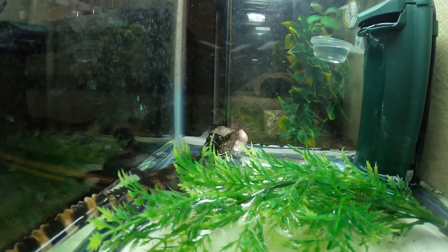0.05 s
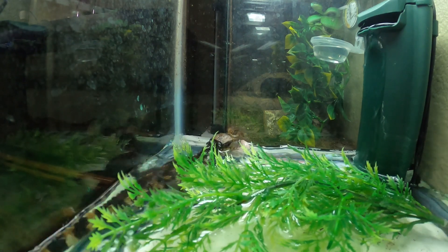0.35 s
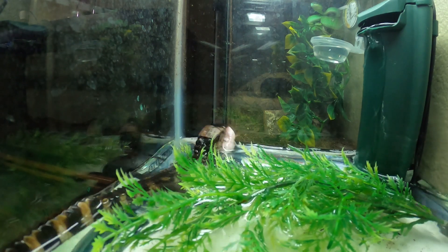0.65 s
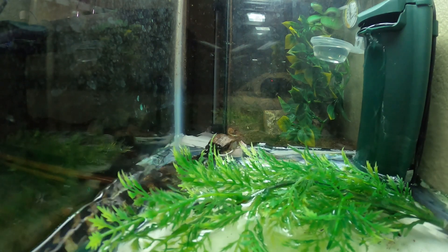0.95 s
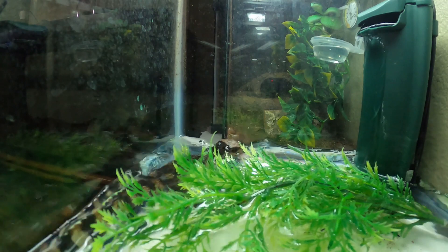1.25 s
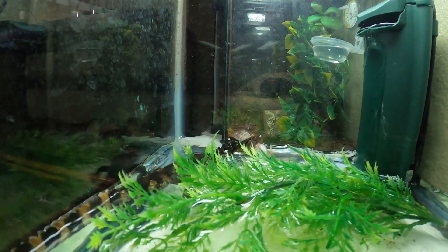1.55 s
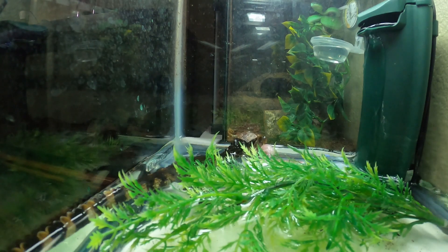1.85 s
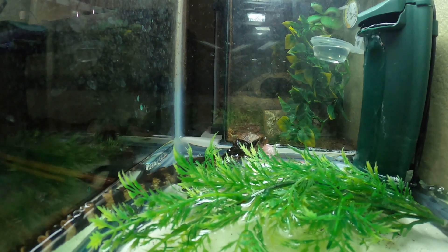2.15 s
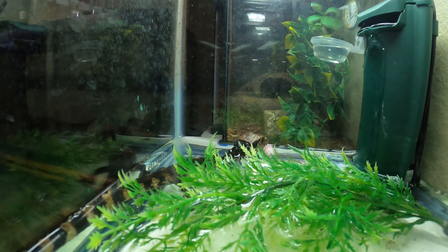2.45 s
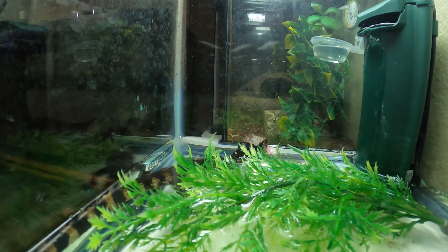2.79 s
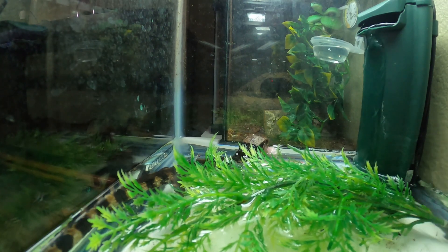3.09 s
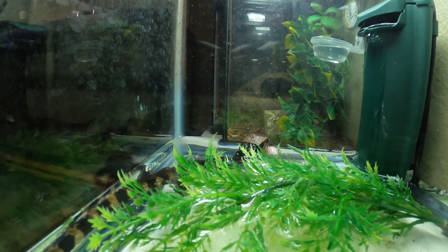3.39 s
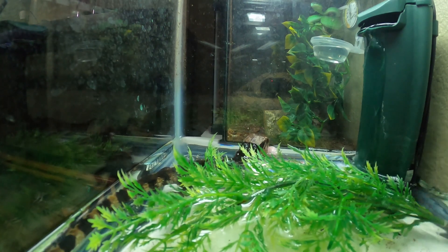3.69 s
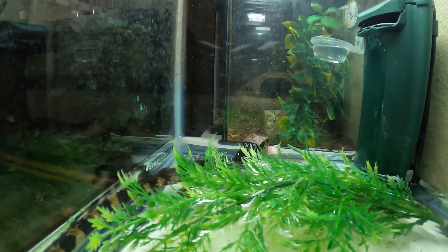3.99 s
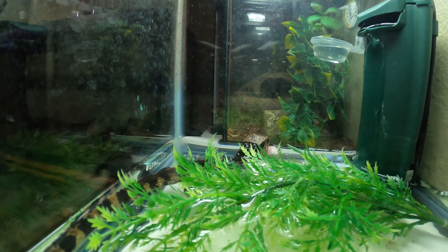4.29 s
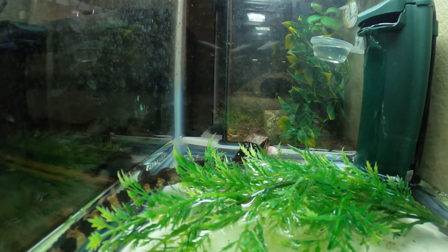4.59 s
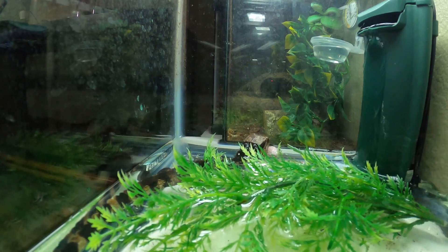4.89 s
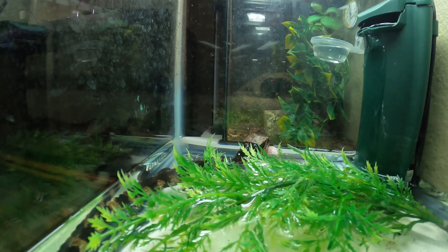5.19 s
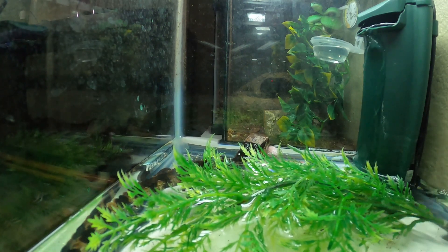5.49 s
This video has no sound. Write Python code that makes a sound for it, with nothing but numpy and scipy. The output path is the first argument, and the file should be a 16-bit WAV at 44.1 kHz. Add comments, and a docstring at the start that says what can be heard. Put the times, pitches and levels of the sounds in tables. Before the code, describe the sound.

In a small room, close to a shallow aquarium, a filter runs steadily with a low motor hum, a fast plastic rattle and churning, faintly fizzing water. Near the start something, probably a small turtle, bumps the tank dully, then clacks on the glass twice with quick splashes, the second bigger. After that the filter carries on, with an occasional soft ping of a tiny bubble popping.

```python
"""A small room, one microphone close to a shallow aquarium with a hang-on filter running.
The loose impeller rattles and grinds in the plastic housing, the mains motor hums, and the outflow
churns and fizzes. In the first seconds something, probably a small turtle, bumps the tank, clacks on
the glass and flicks the water. Now and then a soft ping is heard as a tiny bubble pop."""
import sys
import numpy as np
from scipy import signal
from scipy.fft import rfft, irfft
from scipy.io import wavfile

SR = 44100
rng = np.random.default_rng(int(sys.argv[2]) if len(sys.argv) > 2 else 0)


def file_out(sig):
    """Save sig as 16-bit WAV at sys.argv[1]."""
    # one column per channel
    cols = np.atleast_2d(sig).T
    # limit, then scale
    lim = np.clip(cols, -1, 1)
    pcm = np.round(lim * 32767).astype(np.int16)
    wavfile.write(sys.argv[1], SR, pcm)


N = 253134
TIME = np.arange(N) / SR
MAINS_HZ, CUTOFF_HZ = 59.98, 15500

# resonances of the plastic filter housing: f/Hz, width/Hz, knocked level/dB, rubbed level/dB
HOUSING_MODES = [(583, 32, -24, -11.5), (727, 32, -18, -3.5), (745.7, 40, -12, 0), (821, 10, -32.5, -10.5),
                 (1014.4, 54.5, 4, 13.5), (1081, 48, -11, -3), (1207.5, 19, -22, -2), (1267, 30, -17, 3.5),
                 (1360.4, 10.5, -24, 12), (1550.5, 42, -14.5, 2), (1670, 73, -6.5, -8.5),
                 (1782, 44, -19.5, -9), (1914, 24, -30, -11), (2220, 71, -11, -4.5), (2340, 45, -21.5, -6),
                 (2401, 49, -17.5, -2), (2459, 35, -22, -4.5), (2590, 55, -17, -5), (2773, 83, -10.5, -0.5),
                 (2878, 56, -17, 5.5), (2966, 33, -25, -3.5), (3050, 91, -23, -4.5), (3270, 40, -31, -8.5),
                 (3425, 27, -26.5, -2), (3486, 26, -28.5, -29.5), (3620, 24, -38, -8)]


def motor_hum(waver_db=0.2):
    """The motor hums in steady lines locked to the mains, the strongest at twice its frequency."""
    # hum lines: multiple of the mains frequency, rms level/dB
    lines = [(2, -29.5), (3, -37), (4, -43.5), (4.5, -61), (5, -49.5), (7, -64), (8, -67.5), (10, -73.5),
             (12, -55), (14, -75.5), (17, -56.5)]
    out = np.zeros(N)
    for multiple, db in lines:
        amplitude = np.sqrt(2) * from_db(db + waver_db * drift(12))
        out += amplitude * np.sin(2 * np.pi * (multiple * MAINS_HZ * TIME + rng.random()))
    return out


def impeller_rattle(softest_db=-47, hardest_db=-36, vary_db=1.95, bounce_db=-9,
                    jitter_s=0.0004, lead_s=0.0004):
    """The loose rotor taps its shaft once a turn and bounces back lightly; the housing rings."""
    # knocks that stand out from the random taps of the other turns: t/s, level/dB
    knocks = [(.05, -29), (.067, -33.5), (.417, -33.5), (.518, -35), (.551, -33), (.651, -32),
              (.684, -32.5), (.717, -34.5), (.784, -35.5), (.868, -34), (1.2, -32.5), (1.468, -31.5),
              (1.667, -32.5), (1.734, -30.5), (1.784, -33), (1.801, -35), (1.835, -32), (1.901, -32),
              (1.934, -33.5), (2.002, -34.5), (2.035, -35), (2.051, -33.5), (2.135, -31.5), (2.184, -30.5),
              (2.301, -32.5), (2.452, -29.5), (2.57, -32), (2.701, -32.5), (2.718, -31), (2.784, -33),
              (2.919, -33), (3.119, -34), (3.169, -31), (3.236, -34), (3.352, -33.5), (3.602, -34),
              (3.686, -36), (3.819, -29), (3.967, -31.5), (4.002, -33.5), (4.086, -31.5), (4.185, -30.5),
              (4.601, -35), (4.719, -32.5), (4.803, -32), (4.853, -30.5), (4.904, -34.5), (5.035, -31.5),
              (5.118, -33), (5.218, -33), (5.237, -32.5), (5.301, -34), (5.318, -34), (5.52, -30.5),
              (5.552, -32.5), (5.601, -31), (5.669, -32.5), (5.686, -31.5)]
    knock_s, knock_db = np.transpose(knocks)
    turns_s = np.arange(0, N / SR - 1 / MAINS_HZ, 1 / MAINS_HZ)
    jitter, rebound = rng.standard_normal((2, len(turns_s)))
    taps_s = turns_s - lead_s + jitter_s * jitter
    tap_db = rng.uniform(softest_db, hardest_db, len(turns_s))
    tap_db[np.round(knock_s * MAINS_HZ).astype(int)] = knock_db
    # each touch lands on a slightly different spot and weights the modes anew
    mode_db = tap_db[:, None] + vary_db * rng.standard_normal((len(turns_s), len(HOUSING_MODES)))
    rings = from_db(mode_db) @ housing_rings()
    flights_s = rng.uniform(0.199, 0.66, len(turns_s)) / MAINS_HZ
    out = np.zeros(N)
    for s, ring, polarity, flight_s in zip(taps_s, rings, np.sign(rebound), flights_s):
        add(out, s, ring)
        add(out, s + flight_s, ring * polarity * from_db(bounce_db))
    return out


def housing_rings(swell_s=0.0041):
    """A knock builds up each housing mode in a few ms, then it dies away; one row per mode."""
    age = TIME[:SR // 10]
    hz, width, db, _ = np.transpose(HOUSING_MODES)[:, :, None]
    # each wall patch lies at its own distance, so the modes arrive out of step
    tones = np.sin(2 * np.pi * (hz * age + rng.random(hz.shape)))
    # the blow spreads through shaft and water before it reaches the walls
    swell = (1 - np.exp(-age / swell_s)) ** 2
    envelopes = from_db(db) * swell * np.exp(-np.pi * width * age)
    return tones * envelopes / np.linalg.norm(envelopes, axis=0).max()


def impeller_grind(rms_db=-49, rubs_per_turn=4, buzz_db=4.0, throb_db=1.5, lag_s=0.0016, damping=1.73):
    """The rotor rubs its shaft several times a turn, hardest near the tap; the housing resonates."""
    buzz = buzz_db * np.cos(2 * np.pi * rubs_per_turn * MAINS_HZ * TIME)
    throb = throb_db * np.cos(2 * np.pi * MAINS_HZ * (TIME - lag_s))
    friction = from_db(buzz + throb) * rng.standard_normal(N)
    out = np.zeros(N)
    for hz, width, _, db in HOUSING_MODES:
        # each resonance acts twice, which keeps the valleys between the modes dark
        b, a = signal.iirpeak(hz, hz / (damping * width), fs=SR)
        out += from_db(db) * signal.lfilter(b, a, signal.lfilter(b, a, friction))
    return from_db(rms_db) * rms_one(out)


def tank_bumps(swell_cycles=1.44):
    """Soft blows set the tank wall ringing; a mode builds up in about a cycle, so low ones come last."""
    # dull blows: t/s, level/dB, f/Hz above which the soft contact mutes the wall
    blows = [(0.333, -0.5, 780), (0.423, -3.5, 235), (0.8879, -14, 430)]
    # modes of the tank wall: f/Hz, level/dB, t60/s
    wall_modes = [(170, -8.5, 0.11), (215, -2, 0.092), (264, -11.5, 0.071), (381, -10, 0.035),
                  (662, -11.5, 0.023), (790, -26.5, 0.17)]
    out, age = np.zeros(N), TIME[:SR // 4]
    for s, db, mute_hz in blows:
        for hz, mode_db, t60 in wall_modes:
            gain = from_db(db + mode_db) / np.hypot(1, (hz / mute_hz) ** 2)
            swell = 1 - np.exp(-(age * hz / swell_cycles) ** 2)
            add(out, s, gain * swell * fade(age, t60) * np.sin(2 * np.pi * hz * age))
    return out


def glass_clacks():
    """A hard contact starts all the modes of the glass at once; the water damps them quickly."""
    # contacts, probably shell on glass: t/s, peak level/dB, tilt/(dB per octave)
    contacts = [(0.8908, -17, -7), (0.8948, -26, 18), (1.3341, -22, 1), (1.3425, -24, 1)]
    # modes of the glass: f/Hz, level/dB, t60/s
    glass_modes = [(730, -20, 0.11), (987, -11.5, 0.077), (1470, -9, 0.013), (1730, 0, 0.0076),
                   (2430, 0, 0.013), (3870, -11, 0.014), (4080, 2.5, 0.021), (4840, -17.5, 0.01),
                   (6170, 0, 0.0078), (7060, -13, 0.014), (8100, -25, 0.0071)]
    out, age = np.zeros(N), TIME[:SR // 10]
    hz, mode_db, t60 = np.transpose(glass_modes)[:, :, None]
    for s, db, tilt_db in contacts:
        gain = from_db(mode_db + tilt_db * np.log2(hz)) * rng.choice([-1, 1], hz.shape)
        ring = np.sum(gain * fade(age, t60) * np.sin(2 * np.pi * hz * age), axis=0)
        add(out, s, from_db(db) * ring / np.abs(ring).max())
    return out


def splashes(droplets_per_s=2500, sheet_db=1, slap_db=-9, tail_db=-21):
    """Each flick slaps the surface, throws a sheet of water and droplets, then fizzes out."""
    # flicks of water: t/s, level/dB, lowest f/Hz, tilt/(dB per octave), rise/s
    flicks = [(0.347, -40, 2720, 4.5, 0.0077), (0.892, -33, 600, 0, 0.0083),
              (0.921, -38.5, 2800, 8.5, 0.0051), (1.047, -72, 9000, 14, 0.0015),
              (1.218, -65, 6000, 6, .002), (1.314, -29, 2200, -1, 0.0048), (1.34, -26.5, 524, -2.5, 0.018),
              (1.369, -43, 2500, -2, .002), (1.394, -37.5, 2270, -4, 0.002), (1.449, -62, 7000, 12, .002),
              (1.495, -39.5, 2300, -10.5, 0.002), (2.661, -49, 4400, -8, 0.0033)]
    # spectrum of the spray: f/Hz, density level/dB
    spray_spectrum = [(300, -15), (560, -10), (800, -1.5), (1150, -3), (2000, 3), (3000, -0.5),
                      (4200, -3.5), (6500, -12), (8800, -14.5), (11000, -31.5), (15500, -44)]
    hz, spray_db = np.transpose(spray_spectrum)
    out = np.zeros(N)
    for s, db, low_hz, tilt_db, rise_s in flicks:
        water = crackle(droplets_per_s) + from_db(sheet_db) * rng.standard_normal(N)
        tilted = np.column_stack([hz, spray_db + tilt_db * np.log2(hz / low_hz)])
        spray = rms_one(band(colour(water, tilted), low_hz, CUTOFF_HZ, order=4))
        slap = from_db(slap_db) * (TIME >= s) * fade(TIME - s, t60=0.0014)
        throw = burst(s, rise_s, t60=0.051)
        tail = from_db(tail_db) * burst(s, rise_s, t60=0.17)
        out += from_db(db) * (slap + throw + tail) * spray
    return out


def trapped_bubbles(glide=0.017, onset_s=0.00033):
    """Air trapped by a splash rings and climbs a little in pitch as it nears the surface."""
    # ringing bubbles: t/s, f/Hz, level/dB, t60/s
    bubbles = [(0.894, 2900, -23.5, .036), (0.918, 2870, -21.5, 0.041), (0.922, 2760, -27, 0.04),
               (1.31, 9580, -44, .045), (1.3125, 2920, -35, .018), (1.333, 1455, -13, 0.042),
               (1.336, 1407, -22, 0.09), (1.344, 1526, -30, 0.26), (1.394, 2630, -27, 0.013)]
    out, age = np.zeros(N), TIME[:SR // 4]
    for s, hz, db, t60 in bubbles:
        pitch_hz = hz * (1 + glide * np.minimum(age / t60, 1))
        envelope = (1 - np.exp(-age / onset_s)) * fade(age, t60)
        add(out, s, from_db(db) * envelope * np.sin(2 * np.pi * np.cumsum(pitch_hz) / SR))
    return out


def soft_pops(half_width=0.06, rise_s=0.0026, t60=0.044):
    """Short, soft pings of narrow-band noise that swell quickly and fade, heard as tiny bubble pops."""
    # pings: t/s, centre f/Hz, rms level at the crest/dB
    pings = [(.762, 5550, -53), (1.209, 4200, -43.5), (1.403, 3600, -41), (1.497, 3200, -39),
             (1.54, 6440, -54), (2.012, 3920, -45.5), (2.949, 4070, -38), (3.218, 3900, -52),
             (3.38, 4040, -43), (3.801, 4200, -41.5), (4.212, 6700, -56.5), (4.782, 4230, -46.5),
             (5.523, 4930, -52)]
    out, noise = np.zeros(N), rng.standard_normal(N)
    for s, hz, db in pings:
        ping = rms_one(band(noise, hz * (1 - half_width), hz * (1 + half_width), order=3))
        out += from_db(db) * burst(s, rise_s, t60) * ping
    return out


def outflow(churn_db=-37.5, surge_db=0.5, fizz_db=-52.0, flicker_db=0.5, grains_per_s=1500, grain_db=-3):
    """Falling water churns low in the tank; countless tiny bubbles fizz above it."""
    # spectrum of the churning water: f/Hz, density level/dB
    churn_spectrum = [(20, -27), (36, -24.5), (53, -11.5), (70, -15), (125, -19), (155, -7), (200, -1.2),
                      (240, -5.8), (300, -16), (335, -25), (385, -20), (450, -29.5), (520, -36),
                      (900, -60.5)]
    # spectrum of the fizz: f/Hz, density level/dB
    fizz_spectrum = [(500, -17.5), (1200, 0), (2000, -5.5), (2300, 0), (2900, 2.5), (3300, -1.5),
                     (3750, -3), (4050, -3.5), (5200, -8), (5900, -16), (7300, -16.5), (7900, -21),
                     (8600, -18), (10900, -31.5), (12500, -33.5), (15500, -54)]
    churn = colour(rng.standard_normal(N), churn_spectrum) * from_db(churn_db + surge_db * drift(25))
    grains = from_db(grain_db) * crackle(grains_per_s)
    fizz = colour(rng.standard_normal(N) + grains, fizz_spectrum)
    return churn + fizz * from_db(fizz_db + flicker_db * drift(30))


def reflections(x, t60, first_s, top_hz):
    """Dense echoes off the walls reach the microphone from first_s after the direct sound."""
    age = TIME[:SR // 2]
    tail = band(rng.standard_normal(len(age)), 110, top_hz) * fade(age, t60) * (age > first_s)
    return signal.fftconvolve(x, tail / np.sqrt(np.sum(tail ** 2)))[:N]


def from_db(db):
    """Decibels to gain."""
    return 10 ** (np.asarray(db) / 20)


def rms_one(x):
    """Scale to unit rms."""
    return x / np.sqrt(np.mean(x ** 2) + 1e-20)


def fade(age, t60):
    """Decay by 60 dB in t60 seconds."""
    return np.exp(-np.log(1000) * np.maximum(age, 0) / t60)


def burst(s, rise_s, t60):
    """Envelope that swells to 1 at time s and dies away."""
    return np.exp(np.minimum(TIME - s, 0) / rise_s) * fade(TIME - s, t60)


def band(x, low_hz, high_hz, order=2):
    """Causal band-pass."""
    edges = [low_hz, np.clip(high_hz, low_hz + 100, .45 * SR)]
    return signal.sosfilt(signal.butter(order, edges, "band", fs=SR, output="sos"), x)


def colour(x, spectrum):
    """Shape x by a curve of (f/Hz, level/dB) points; unit rms."""
    hz, db = np.transpose(spectrum)
    bins_hz = np.maximum(np.fft.rfftfreq(N, 1 / SR), 1)
    gain = from_db(np.interp(np.log(bins_hz), np.log(hz), db, left=-90, right=-90))
    return rms_one(irfft(rfft(x) * gain, N))


def crackle(per_s):
    """Clicks of random size at random times; unit rms."""
    return rms_one(rng.standard_normal(N) * (rng.random(N) < per_s / SR))


def drift(knots_per_s):
    """Slow random wander; unit rms."""
    knots = rng.standard_normal(int(knots_per_s * N / SR) + 2)
    return rms_one(np.interp(TIME * knots_per_s, np.arange(len(knots)), knots))


def add(out, s, sound):
    """Mix a sound into out from time s on."""
    start = max(round(s * SR), 0)
    out[start:start + len(sound)] += sound[:N - start]


def scene(glass_db=-7, room_db=-13.5):
    """Beside the tank, in mono: spray echoes between the panes, and short sounds leave a room tail."""
    spray = splashes() + soft_pops()
    spray += from_db(glass_db) * reflections(spray, t60=0.015, first_s=0.00046, top_hz=10300)
    near = spray + trapped_bubbles() + glass_clacks() + tank_bumps() + impeller_rattle()
    room = from_db(room_db) * reflections(near, t60=0.1, first_s=0.00703, top_hz=8300)
    return (near + room + motor_hum() + impeller_grind() + outflow())[None]


def record(dry):
    """The microphone signal is cut steeply above CUTOFF_HZ."""
    return signal.sosfilt(signal.ellip(10, .1, 80, CUTOFF_HZ, fs=SR, output="sos"), dry)


dry = scene()
out = record(dry)
file_out(out)
```